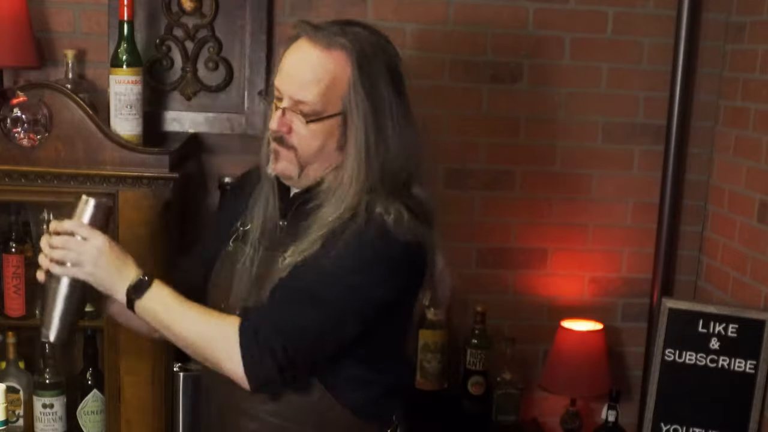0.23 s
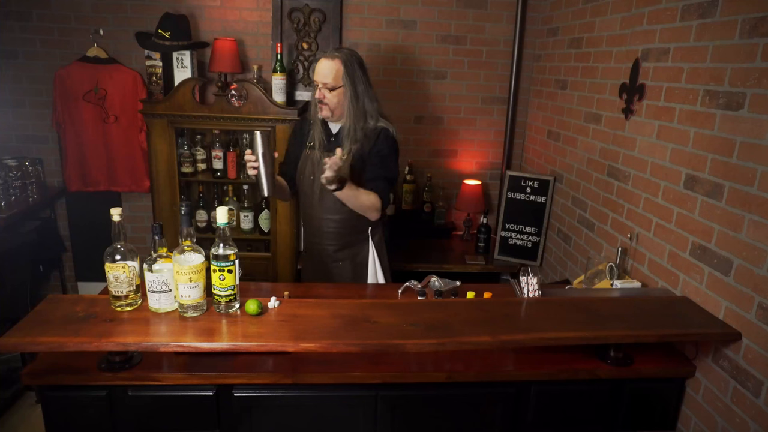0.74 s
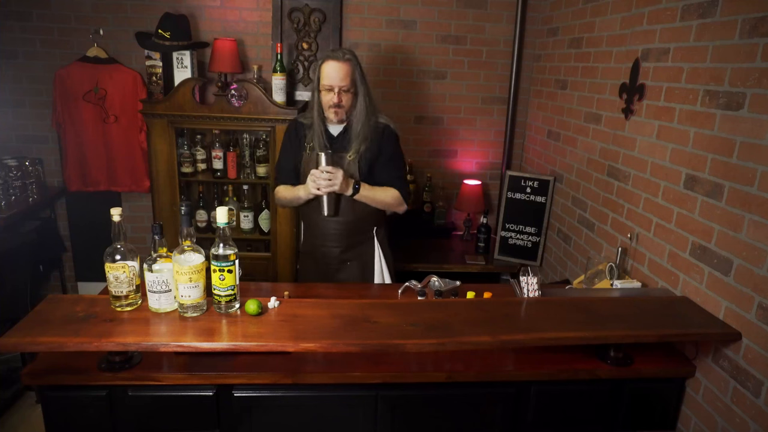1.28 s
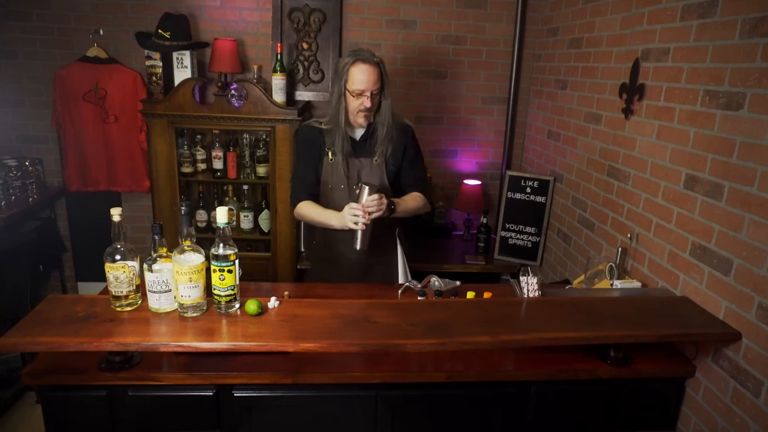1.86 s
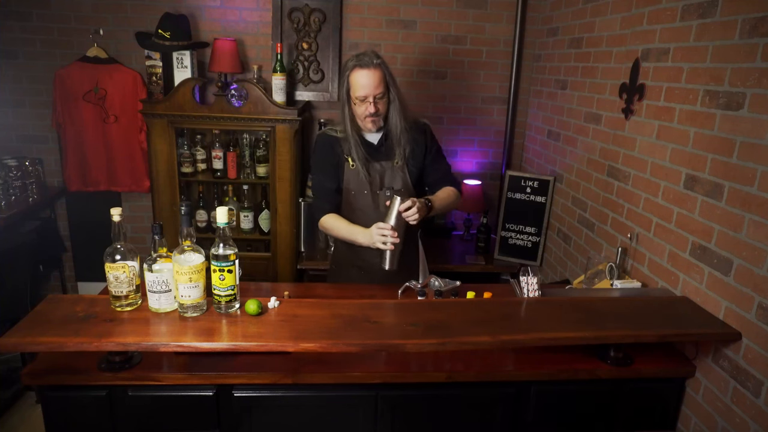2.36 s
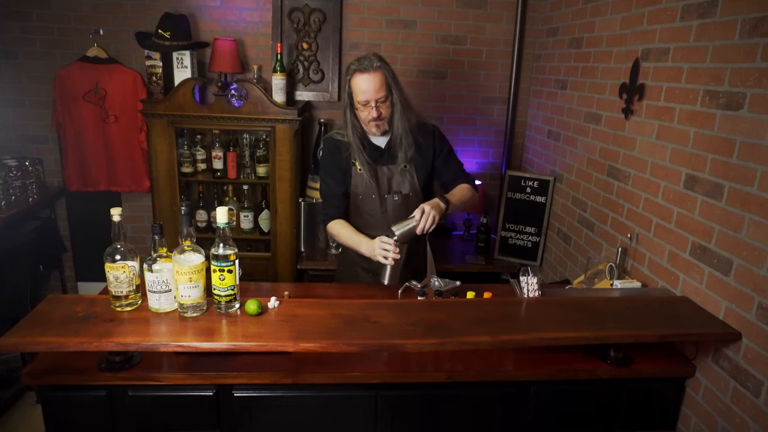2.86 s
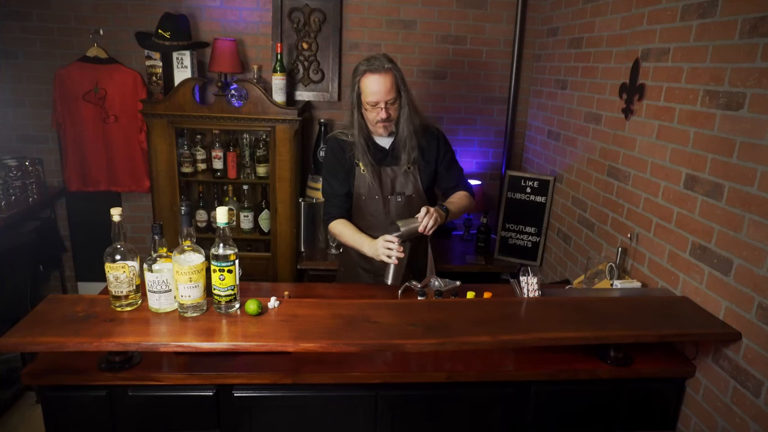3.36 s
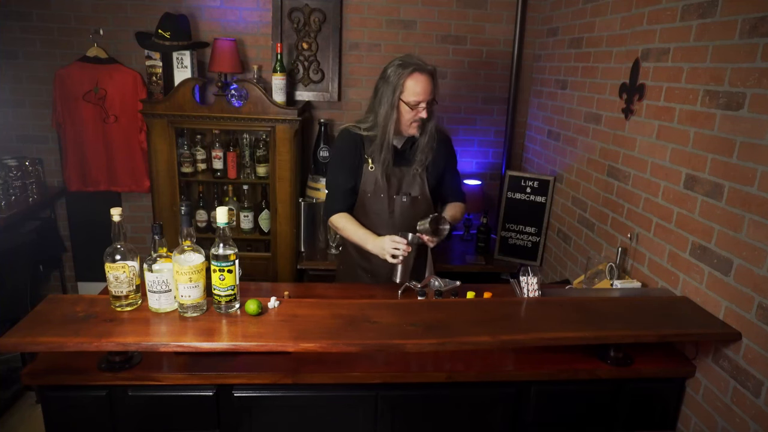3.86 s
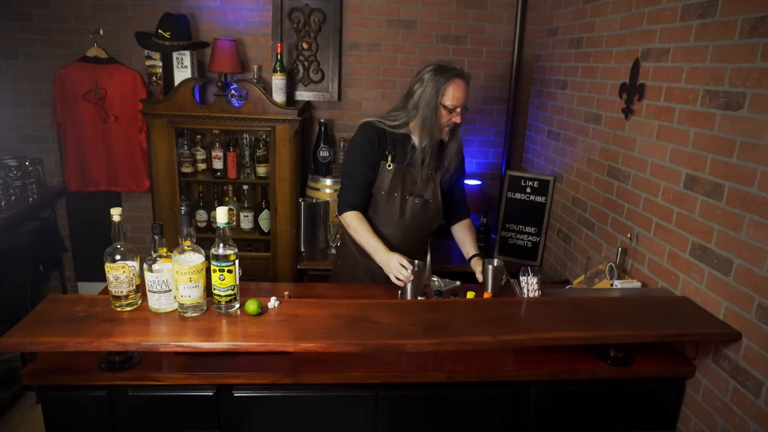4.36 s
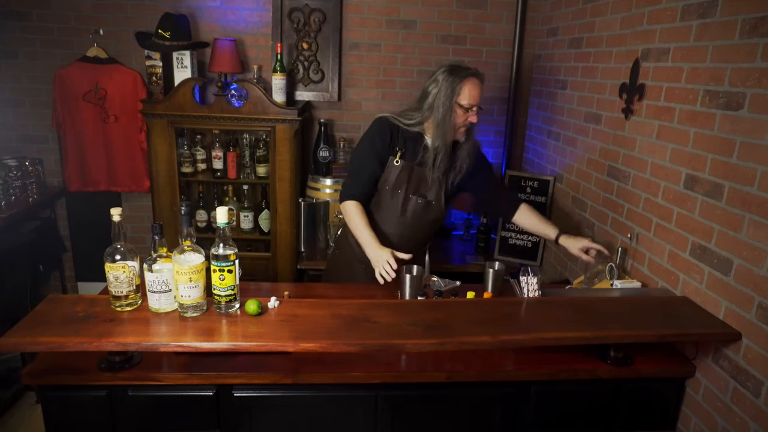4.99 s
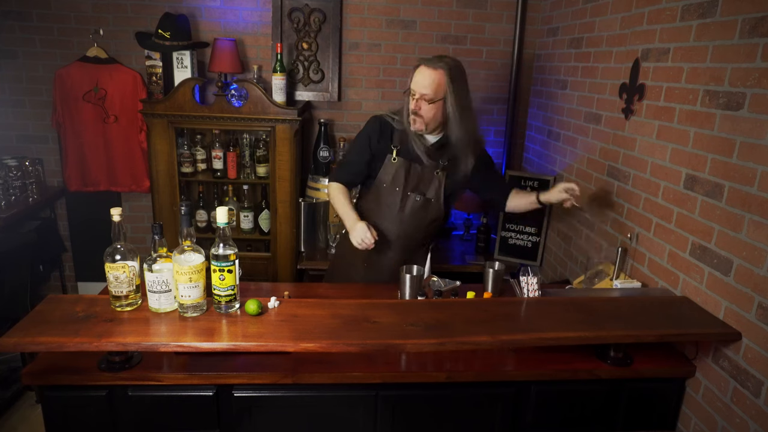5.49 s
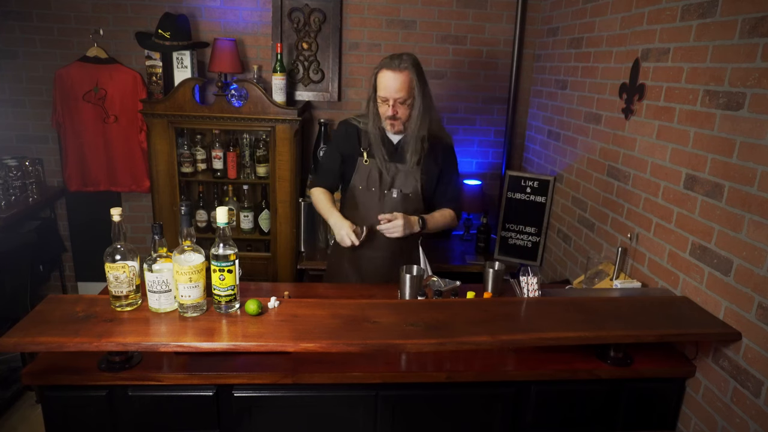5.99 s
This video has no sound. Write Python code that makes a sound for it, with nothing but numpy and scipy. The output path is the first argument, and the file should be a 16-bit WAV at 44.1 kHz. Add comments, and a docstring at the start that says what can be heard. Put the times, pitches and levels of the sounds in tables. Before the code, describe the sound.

Ice rattles briefly in a steel cocktail shaker and settles into scattered clicks. A palm slaps the shaker, then its two tins twist and slide apart with a jerky, ringing scrape. One tin taps the other's rim three times and is set down on a wooden bar with a hollow knock. A small metal tool ticks near the end. Clothes rustle faintly, all close to the microphone in a small quiet room.

```python
"""In a small quiet room, close to one microphone, ice rattles in a steel shaker, heard in the centre.
Impacts and friction excite the modes of the steel: a palm slaps the shaker, and its two tins are
twisted and slid apart. The small tin is tapped three times on the rim of the large one, then set
down on a wooden bar; later a tin is nudged and a small tool picked up. Cloth rustles underneath."""
import sys
import numpy as np
from scipy import signal
from scipy.fft import rfft, irfft
from scipy.io import wavfile
from scipy.ndimage import uniform_filter1d

SR = 44100
rng = np.random.default_rng(int(sys.argv[2]) if len(sys.argv) > 2 else 0)


def transcribe(signal):
    """Save signal, clipped to [-1, 1], as a 16-bit WAV file at the path in sys.argv[1]."""
    frames = np.atleast_2d(signal).T
    limited = np.clip(frames, -1, 1)
    pcm = np.round(limited * 32767).astype(np.int16)
    wavfile.write(sys.argv[1], SR, pcm)


N = 275184
SHAKEN_HZ, CUPPED_HZ = 9000, 5500  # treble limit of the cubes, then with both hands round the tin


def clack(hz, t60, muffle_hz):
    """Damped impact: a cube on wet steel gives a few cycles at its pitch and a bright edge."""
    t = np.arange(600) / SR
    burst = noise(len(t)) * decay(t, t60) * attack(t, 0.00034)
    pitch = resonate(resonate(burst, hz, 800), hz, 2000)
    edge = decay(t, t60, db=-9.5) * resonate(burst, 2500, 3100)
    sound = dull(thin(pitch + edge, 820), muffle_hz)
    return sound / abs(sound).max()


# Single cubes hit the wall, and one clack at 0.8907 s marks the palm slap. Each row: start in seconds, peak in
# dB, pitch in Hz.
CLACKS = [(0.0237, -3.5, 3170), (0.0596, -6.5, 4860), (0.0747, -7.5, 2850), (0.086, -6, 3250),
          (0.108, -7, 3260), (0.128, -11, 3250), (0.137, -9.5, 5440), (0.1869, -9, 1900),
          (0.2061, -8, 3180), (0.3173, -14.5, 2300), (.338, -24.5, 6000), (0.368, -30, 4600),
          (0.3995, -17, 2200), (.426, -19, 4700), (0.4325, -21, 3570), (0.47, -20, 4650),
          (0.5224, -15, 3130), (0.5766, -23, 3550), (0.597, -27.5, 3100), (0.6857, -29.5, 3060),
          (0.861, -29, 3240), (0.8907, -8.5, 1450), (0.897, -2, 3370), (0.976, -17, 3270),
          (0.997, -12, 3140), (1.0522, -13.5, 3280), (1.0787, -24, 3340), (1.0998, -24.5, 2860),
          (1.123, -25, 3070), (1.1932, -31, 3250), (1.2132, -22.5, 2900), (1.225, -24.5, 2980),
          (1.313, -25, 3400), (1.4695, -30.5, 3300), (1.56, -33, 3130), (1.6246, -21, 3300),
          (1.635, -15, 3270), (1.644, -19, 3270), (1.6614, -35, 3210), (1.6752, -16, 3300),
          (1.682, -21, 3200), (1.702, -22, 3150), (1.775, -20, 2700), (1.7963, -27, 3070),
          (2.2915, -24.5, 2400)]

def cubes():
    """Impulsive excitation: each loud cube, and the slap, gives one clack, duller once the hands cup the tin."""
    out = np.zeros(N)
    for start, db, hz in CLACKS:
        muffle_hz = SHAKEN_HZ if start < 1 else CUPPED_HZ
        add(out, start, gain_of(db) * clack(hz, t60=0.011, muffle_hz=muffle_hz))
    return out


# Modes of the shut, hand-damped shaker. Each row: frequency in Hz, bandwidth in Hz, gain in dB.
SHUT_MODES = [(1800, 1200, 0.5), (3240, 360, 0), (4480, 520, 0.5), (5530, 410, -0.5), (5660, 1600, -19),
              (8400, 1000, -15)]
# The end of the shaking and one last roll. Each row: start and end in seconds, level in dB.
ICE_TUMBLES = [(0, 0.178, -22), (0.425, 0.546, -44)]

def tumbling_ice():
    """Random forcing: slush and many small collisions drive the damped modes of the wall."""
    hits_per_s, rise_db_per_s, fall_db_per_s = 800, 286.5, 101
    strength = gain_of(3.5 * np.minimum(rng.exponential(1, N), 3.5))
    hits = strength * (rng.random(N) < hits_per_s / SR)
    pitch_index, grains = rng.integers(0, 16, N), np.zeros(N)
    for k, hz in enumerate(np.geomspace(1600, 7500, 16)):
        grain = clack(hz, t60=0.006, muffle_hz=SHAKEN_HZ)
        grains += signal.oaconvolve(hits * (pitch_index == k), grain)[:N]
    drive = (evened(grains) + 0.28 * noise(N))[:SR]
    wall = evened(evened(body(drive, SHUT_MODES)) + 0.5 * thin(drive, 1300))
    t, envelope = np.arange(N) / SR, np.zeros(N)
    for start, end, db in ICE_TUMBLES:
        before, after = np.maximum(start - t, 0), np.maximum(t - end, 0)
        envelope += gain_of(db - rise_db_per_s * before - fall_db_per_s * after)
    return np.pad(wall, (0, N - SR)) * envelope


# Tones of the wall. Each row: start in seconds, level in dB, frequency in Hz, length in seconds.
WALL_TONES = [(0.227, -23, 2305, 0.16), (0.999, -34.5, 2320, 0.083), (1.336, -41, 2378, 0.083),
              (2.146, -38, 2364, 0.098)]

def singing_wall():
    """Free vibration: one mode rings on, wavering, until a hand grips the wall."""
    out, waver = np.zeros(N), lumps(per_s=60, depth_db=3.5)
    for start, db, hz, length in WALL_TONES:
        t = np.arange(0, length, 1 / SR)
        tone = sine(hz, t) * decay(t, 0.45, db) * signal.windows.tukey(len(t), 0.2)
        add(out, start, tone * waver[round(start * SR):][:len(t)])
    return out


# Modes of the open tin. Each row: frequency in Hz, level in dB, free decay time (T60) in seconds.
OPEN_MODES = [(232, 7, 0.22), (440, -5.5, 0.24), (537, 3, 0.14), (620, -9, 0.08), (948, -16, 0.45),
              (1740, -18, 0.35), (2379, -12, 0.25), (2785, -21, 0.15), (3004, -1, 0.14), (3130, 1, 0.025),
              (4050, -15, 0.15), (4810, -15, 0.19), (4970, -9, 0.1)]
# Tin strikes tin. Each row: start in seconds, level in dB, gain of the modes below 800 Hz in dB,
# chatter in dB, looseness of the grip as a factor on the decay time.
RIM_BLOWS = [(2.4587, -18.5, -17, -17.5, 0.18), (3.286, -10.5, 4, -22.5, 0.64),
             (3.444, -12.5, 0, -17, 0.53), (3.573, -13.5, 1.5, -11, 0.48), (3.591, -23.5, 6.5, -15.5, 0.28)]

def rim_taps():
    """Modal ringing: each blow excites close pairs of modes that beat; rim chatter roughens them."""
    out, t, chatter_t = np.zeros(N), np.arange(SR // 3) / SR, np.arange(SR // 5) / SR
    hz, mode_db, t60 = np.transpose(OPEN_MODES)[..., None]
    upper_hz = 1200 * 13 ** rng.random((240, 1))  # a crowd of weak modes, the higher the shorter
    upper_modes = sine(upper_hz, t) * decay(t, 0.16 * (3000 / upper_hz) ** 0.4)
    for start, db, bass_db, chatter_db, looseness in RIM_BLOWS:
        struck_db = mode_db + bass_db * (hz < 800) + 1.5 * noise(hz.shape)
        beating = 1 + 0.5 * np.cos(2 * np.pi * (0.004 * hz * t + rng.random(hz.shape)))
        ring = (sine(hz, t) * beating * decay(t, looseness * t60, struck_db)).sum(0)
        crack = resonate(noise(len(t)), 1150, 600) * decay(t, 0.03, db=5)
        jangle = gain_of(-38) * (upper_modes * noise(upper_hz.shape)).sum(0)
        contacts = noise(len(chatter_t)) * (rng.random(len(chatter_t)) < 0.03)
        force = contacts * decay(chatter_t, 0.26, chatter_db)
        force[0] = 1  # the blow itself
        add(out, start, gain_of(db) * signal.fftconvolve(ring + crack + jangle, force))
    return thin(out, 360)


# Modes of the rubbed, loose tin. Each row: frequency in Hz, bandwidth in Hz, gain in dB.
LOOSE_MODES = [(240, 26, -14.5), (1120, 52, -7), (1620, 68, -7), (1835, 91, -9), (2384, 11, 5),
               (3030, 41, -0.5), (3870, 34, -17), (4343, 79, -13.5), (4825, 180, -15.5), (5630, 140, -17.5)]
# The small tin slides out in jerks. Each row: time in seconds, level of the friction in dB.
SLIDE_FRICTION = [(2.58, -27), (2.66, -19.5), (2.682, -6.5), (2.715, -20), (2.8, -15), (2.828, -9.5),
                  (2.89, -13.5), (2.91, -18), (2.97, -15), (3.012, -19), (3.06, -28.5), (3.12, -67)]

def sliding_tin():
    """Frictional excitation: rim rubs on wall, ringing the steel and the air in the widening gap."""
    part_s, free_s, shut_hz, open_hz = 2.7, 3.0, 380, 548
    grip_s, grip_db_per_s = 3.05, 250  # fingers close on the tin and stop its ring
    span = slice(round(SLIDE_FRICTION[0][0] * SR), round((SLIDE_FRICTION[-1][0] + 0.15) * SR))
    t = np.arange(N)[span] / SR
    pressure = gain_of(np.interp(t, *np.transpose(SLIDE_FRICTION)))
    rub = (noise(N) * lumps(per_s=200, depth_db=2))[span] * pressure
    treble = gain_of(-27) * thin(rub * pressure, 5300)  # in dB it grows twice as fast as the rub
    steel = body(rub, LOOSE_MODES) + treble
    opening = np.clip((t - part_s) / (free_s - part_s), 0, 1)
    gap_hz = shut_hz + (open_hz - shut_hz) * opening ** 2.6  # the air note climbs late
    air = gain_of(-4.5) * resonate(rub, gap_hz, 27) * np.minimum(5 * opening, 1)
    grip = gain_of(-grip_db_per_s * np.maximum(t - grip_s, 0))
    return np.pad((steel + air) * grip, (span.start, N - span.stop))


# Modes of the wooden top. Each row: frequency in Hz, relative level in dB, and decay time in seconds
# before it is shortened by the damping factor.
WOOD_MODES = [(180.2, -4, 0.41), (296, 13.5, 0.073), (840, -2, 0.18), (1002, 0, 0.13), (1860, -6, 0.14),
              (2320, -9.5, 0.16)]
# Things put down or moved. Each row: start in seconds, thud in dB, tick in dB, hollow note in Hz.
BAR_KNOCKS = [(4.094, -56, -86, 845), (4.146, -53, -71, 832), (4.315, -53.5, -79.5, 633),
              (4.551, -7.5, -30, 512), (4.692, -39.5, -69, 647), (4.855, -41, -53.5, 395),
              (4.915, -33, -51, 394), (5.411, -44, -51, 864)]

def bar_knocks():
    """Impact on a plate: the wood rings under a dull wash and a tick; harder knocks are brighter."""
    out, t, damping_factor = np.zeros(N), np.arange(SR // 2) / SR, 0.71
    hz, mode_db, t60 = np.transpose(WOOD_MODES)[..., None]
    for start, db, tick_db, hollow_hz in BAR_KNOCKS:
        struck_db = mode_db - 10.5 + 2 * noise(hz.shape)
        ring = (sine(hz, t) * decay(t, damping_factor * t60, struck_db)).sum(0)
        wash = resonate(resonate(noise(len(t)), hollow_hz, 450), hollow_hz, 1060) * decay(t, 0.18, db=7)
        trapped_air = sine(hollow_hz, t) * decay(t, 0.087)  # under the base of the tin
        thud = gain_of(db) * dull(ring + wash + trapped_air, 6200 * gain_of(0.28 * db))
        tick = dull(thin(resonate(noise(len(t)), 4400, 3500), 2170), 5500) * decay(t, 0.15, tick_db)
        add(out, start, (thud + tick) * attack(t, 0.0018))
    return thin(out, 60)


# Palm and fingers land. Each row: start in seconds, level in dB, pitch in Hz, decay time in seconds.
HAND_THUMPS = [(.896, -7.5, 76, 0.045), (0.904, -8, 318, 0.025), (1.257, -24.5, 112, 0.038),
               (1.384, -21.5, 127, 0.011), (1.445, -27, 103, 0.043), (6.17, -44, 98.3, .08)]

def hands():
    """Soft impact: flesh gives a low, heavily damped thump with a puff of skin noise."""
    out, t = np.zeros(N), np.arange(SR // 4) / SR
    for start, db, hz, t60 in HAND_THUMPS:
        thump = sine(hz, t) * decay(t, t60)
        puff = resonate(resonate(noise(len(t)), 0.8 * hz, 730), 5.5 * hz, 1800) * decay(t, 0.018, db=10.5)
        add(out, start, gain_of(db) * (thump + puff) * attack(t, 0.0038))
    return thin(out, 33)


# Slush thrown by the slap, and later a small metal tool picked up.
# Each row: start in seconds, level in dB, decay time in seconds, bass cutoff in Hz.
TICK_SPRAYS = [(0.897, -25, .25, 3500), (5.966, -30.5, 0.042, 2280), (5.984, -46.5, 0.31, 2230)]

def sprays():
    """Shot noise: dense tiny impacts merge into a bright spray that starts at once and dies away."""
    out, t = np.zeros(N), np.arange(SR // 4) / SR
    for start, db, t60, low_hz in TICK_SPRAYS:
        fizz = noise(len(t))
        spikes_db = 7.1 * rng.exponential(1, len(t)) * (rng.random(len(t)) < 0.02)
        ticks = thin(evened(fizz * gain_of(spikes_db)), low_hz)
        add(out, start, ticks * decay(t, t60, db) * attack(t, 0.0021))
    return out


# Ice shifts and the tins are twisted. Each row: start and end in seconds, level in dB, pitch in Hz.
RUBS = [(0.84, 0.892, -37, 3160), (0.851, 1.014, -30.5, 2700), (1.12, 1.314, -50, 2590),
        (1.321, 1.348, -29, 2650), (1.374, 1.401, -37.5, 2970), (1.437, 1.496, -46.5, 1270),
        (1.583, 1.752, -46.5, 3060), (1.805, 1.829, -48, 2840), (1.91, 1.959, -31.5, 2590),
        (1.934, 2.02, -50, 2090), (2.027, 2.139, -37.5, 1990), (2.078, 2.197, -31.5, 3000),
        (2.106, 2.137, -37.5, 2200), (2.274, 2.326, -45, 1910), (2.32, 2.494, -40, 2940),
        (2.447, 2.562, -44.5, 1910), (2.643, 2.727, -40, 1860), (3.472, 3.492, -25, 1960),
        (3.563, 3.643, -39, 1790), (3.702, 3.763, -42.5, 3460)]

def scrapes():
    """Friction noise: grit swells and fades, filtered by the wall and by the spot that rubs."""
    grit, out = noise(N) * lumps(per_s=500, depth_db=3.7), np.zeros(N)
    wall = evened(body(grit, SHUT_MODES, width_factor=0.45))
    for start, end, db, hz in RUBS:
        span = slice(round(start * SR), round(end * SR))
        spot = evened(resonate(resonate(grit[span], hz, 500), hz, 1200))
        rub = spot + 0.84 * wall[span] + gain_of(-31.5) * grit[span]
        swell = np.sin(np.pi * np.linspace(0, 1, len(rub)) ** 0.93) ** 2.45
        out[span] += gain_of(db) * rub * swell
    return dull(thin(out, 460), 7000)


# Spectra of soft and crisp rustle. Each row: frequency in Hz, relative spectral density in dB.
SOFT_SPECTRUM = [(30, -20.5), (80, 1), (300, 8.5), (900, -3.5), (2000, -54)]
CRISP_SPECTRUM = [(300, -25), (900, -1.5), (3000, -1), (7000, -16), (16000, -32.5)]
# Arm movements. Each row: middle and length in seconds, bass level in dB, treble level in dB.
ARM_MOVES = [(.15, 1.38, -48, -51), (1.283, 1.39, -53, -51), (2.134, 0.81, -55.5, -56),
             (2.794, 0.71, -77, -48), (4.023, 0.46, -66.5, -69), (4.919, 0.6, -61.5, -63.5),
             (5.446, 0.22, -61.5, -60.5), (5.886, 0.37, -58, -56), (6.205, .2, -62, -61.5)]

def cloth():
    """Amplitude-modulated noise: sleeves and apron rustle unevenly, swelling with each movement."""
    middle, length, bass_db, treble_db = np.transpose(ARM_MOVES)[..., None]
    swell = np.cos(np.pi * np.clip((np.arange(N) / SR - middle) / length, -0.5, 0.5)) ** 2
    soft = coloured(SOFT_SPECTRUM) * (gain_of(bass_db) * swell).sum(0) * lumps(25, 3.5)
    crisp = coloured(CRISP_SPECTRUM) * (gain_of(treble_db) * swell).sum(0) * lumps(65, 1.8)
    return soft + crisp


# Decay of the room. Each row: frequency in Hz, reverberation time in seconds.
ROOM_T60 = [(200, 0.37), (2000, 0.22), (12000, 0.0064)]

def room(x):
    """Reverberation: sparse reflections of random sign, each band dying at its own rate."""
    reflections = np.zeros(SR // 2)
    slots = np.arange(130, SR // 2 - 20, 20)
    reflections[slots + rng.integers(0, 20, len(slots))] = rng.choice([-1., 1.], len(slots))
    hz, t, bands = signal.stft(reflections, SR, nperseg=256)
    tail = signal.istft(bands * decay(t, read(ROOM_T60, hz)[:, None]), SR, nperseg=256)[1]
    return signal.fftconvolve(x, tail / np.linalg.norm(tail))[:N]


# Spectrum of the noise floor. Each row: frequency in Hz, relative spectral density in dB.
HISS_SPECTRUM = [(30, 1), (250, 1), (3000, -8), (16000, -31)]

def hiss():
    """Stationary noise: the faint floor of room and microphone."""
    return gain_of(-62.5) * coloured(HISS_SPECTRUM)


def gain_of(db):
    return 10 ** (np.asarray(db) / 20)


def noise(shape):
    return rng.standard_normal(shape)


def sine(hz, t):
    return np.sin(2 * np.pi * hz * t)


def attack(t, rise_s):
    return np.minimum(t / rise_s, 1)


def decay(t, t60, db=0):
    """Exponential decay: the level starts at db and falls 60 dB every t60 seconds."""
    return gain_of(db - 60 * t / t60)


def evened(x):
    """Normalisation to unit RMS."""
    return x / np.sqrt(np.mean(x ** 2) + 1e-20)


def read(points, hz):
    """Interpolation on a logarithmic frequency axis."""
    point_hz, value = np.transpose(points)
    return np.interp(np.log(hz + 1), np.log(point_hz + 1), value)


def add(mix, start, sound):
    """Superposition: the sound joins the mix at start seconds."""
    part = mix[round(start * SR):][:len(sound)]
    part += sound[:len(part)]


def resonate(x, hz, width_hz):
    """Resonance by heterodyning: shift hz, which may glide, down to zero, smooth, and shift back."""
    carrier = np.exp(2j * np.pi * np.cumsum(hz * np.ones(len(x))) / SR)
    pole = np.exp(-np.pi * width_hz / SR)
    return 2 * (carrier * signal.lfilter([1 - pole], [1, -pole], x / carrier + 1e-18)).real


def body(x, modes, width_factor=1):
    """Modal superposition: a sum of resonances with alternating sign."""
    return sum((-1) ** k * gain_of(db) * resonate(x, hz, width_factor * width_hz)
               for k, (hz, width_hz, db) in enumerate(modes))


def coloured(spectrum):
    """Spectral shaping of white noise, at unit RMS."""
    gains = gain_of(read(spectrum, np.fft.rfftfreq(N, 1 / SR)))
    return evened(irfft(rfft(noise(N)) * gains, N))


def lumps(per_s, depth_db):
    """Random modulation: a gain that wanders smoothly, by depth_db RMS."""
    size = int(SR / per_s)
    return gain_of(depth_db * evened(uniform_filter1d(uniform_filter1d(noise(N), size), size)))


def thin(x, hz):
    """Third-order high-pass filter."""
    return signal.sosfilt(signal.butter(3, hz, "high", fs=SR, output="sos"), x)


def dull(x, hz):
    """Second-order low-pass filter."""
    return signal.sosfilt(signal.butter(2, hz, fs=SR, output="sos"), x)


def scene():
    """Superposition: direct sound, reverberation and background add, alike in both channels."""
    ice = tumbling_ice() + cubes() + singing_wall()
    direct = ice + sprays() + scrapes() + sliding_tin() + rim_taps() + bar_knocks() + hands()
    # the microphone softens the treble of the close sounds
    softened = signal.lfilter(*signal.butter(1, 9000, fs=SR), direct)
    return np.tile(softened + gain_of(-15) * room(softened) + cloth() + hiss(), (2, 1))


def record(dry):
    """Mid-side stereo: a faint side signal in deep bass and treble, then saturation and a band limit."""
    side_db = read([(40, -29), (800, -53.5), (2500, -85), (14000, -39.5)], np.fft.rfftfreq(N, 1 / SR))
    side = irfft(rfft(np.roll(dry[0], 40)) * gain_of(side_db), N)
    stereo = thin(dry + side * np.array([[1], [-1]]), 21)
    saturated = 0.9 * stereo / (0.5 + stereo ** 6) ** (1 / 6)
    low_pass = signal.firwin(511, 16000, window=("kaiser", 9), fs=SR)
    return signal.oaconvolve(saturated, low_pass[None], "same")


dry = scene()
out = record(dry)
transcribe(out)
```